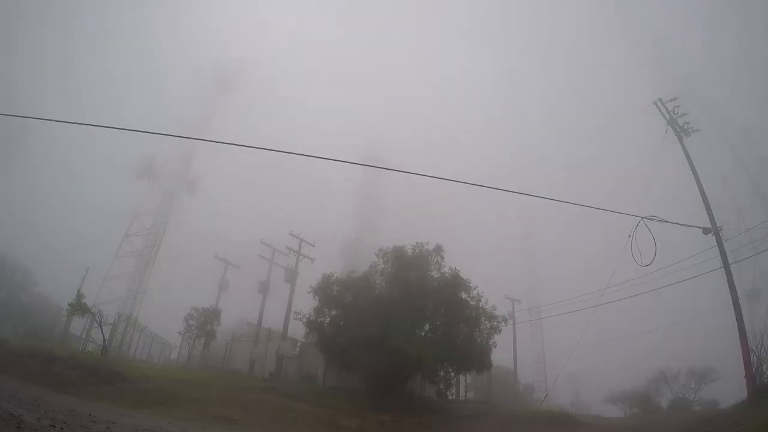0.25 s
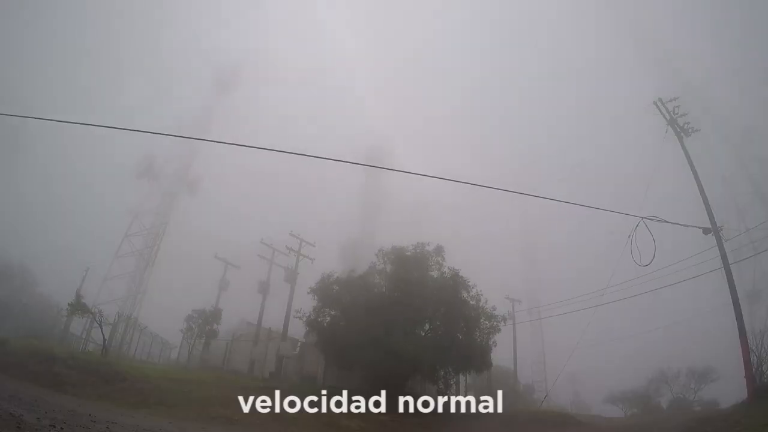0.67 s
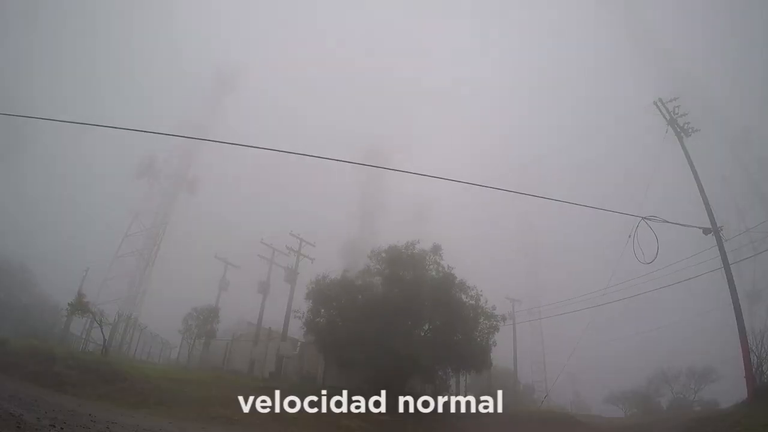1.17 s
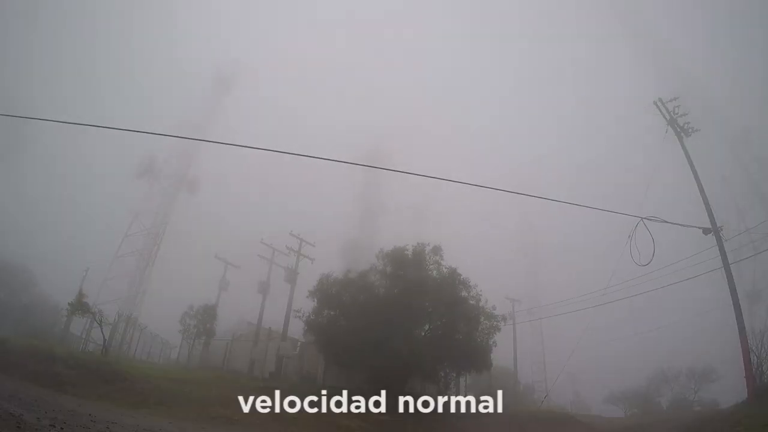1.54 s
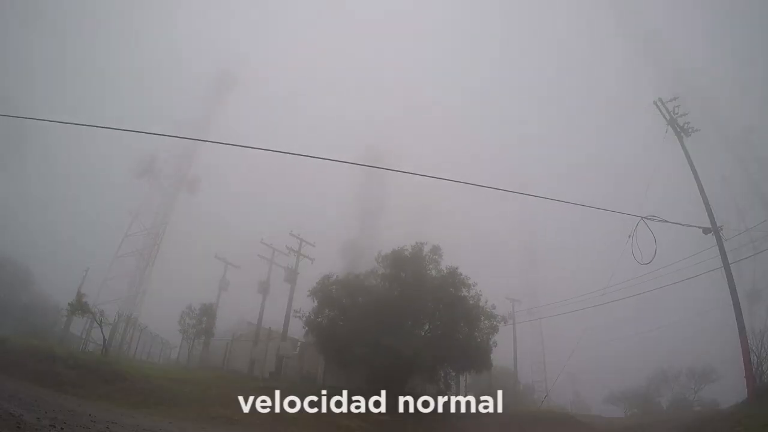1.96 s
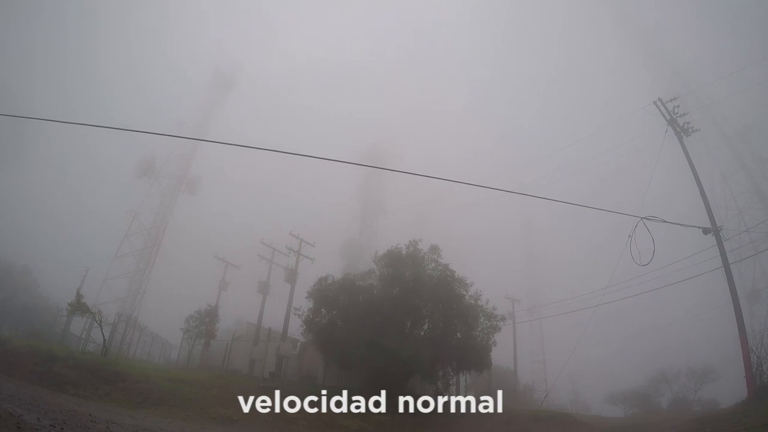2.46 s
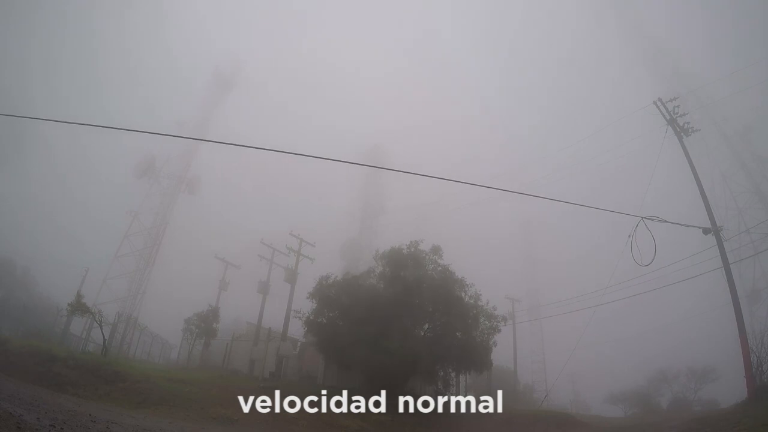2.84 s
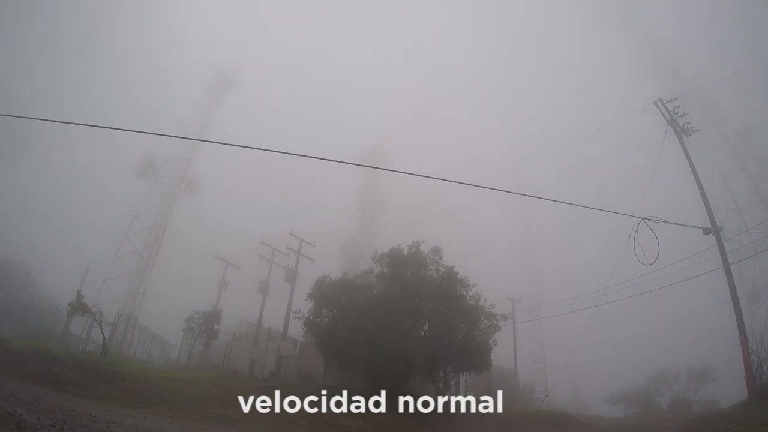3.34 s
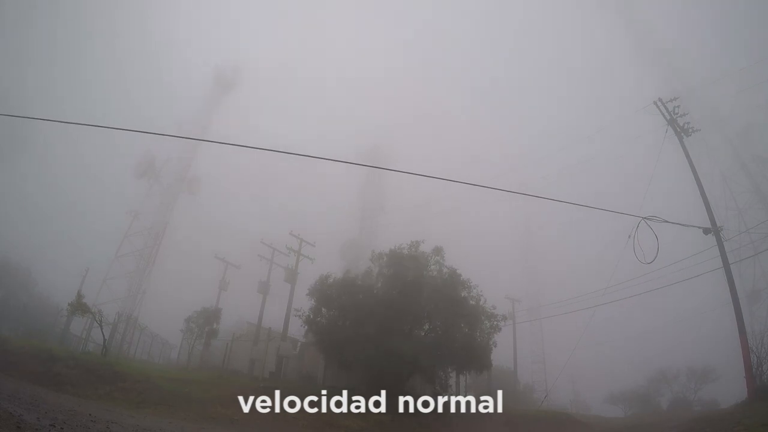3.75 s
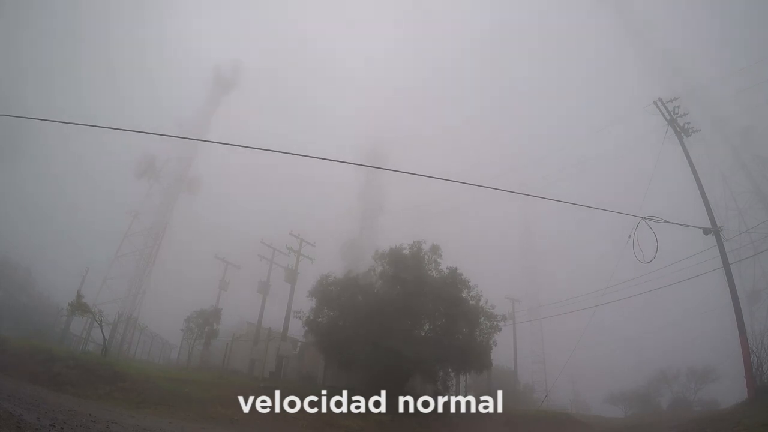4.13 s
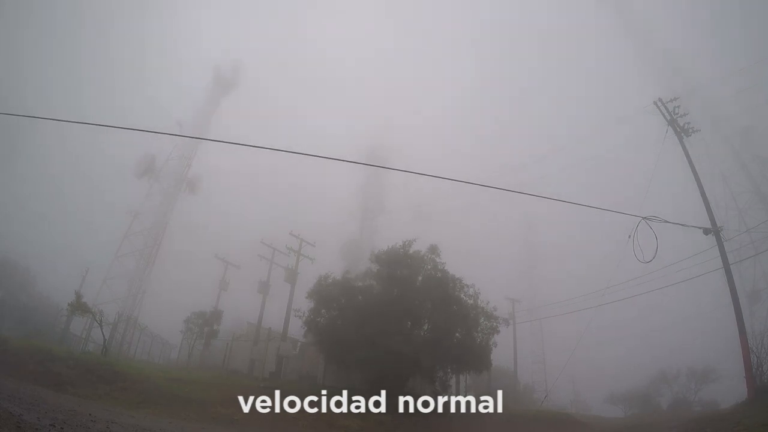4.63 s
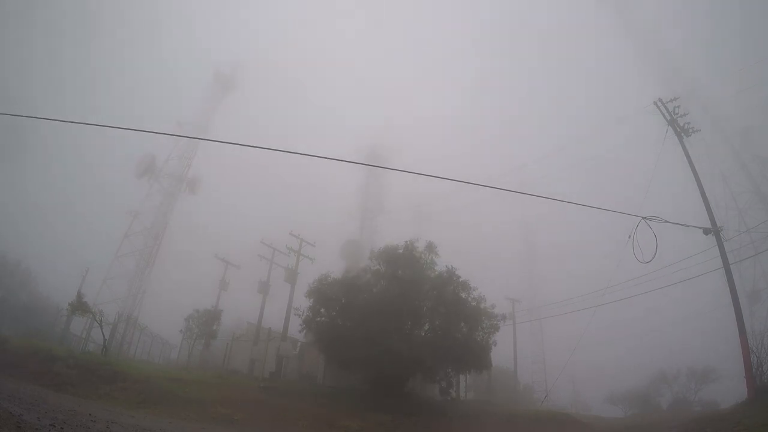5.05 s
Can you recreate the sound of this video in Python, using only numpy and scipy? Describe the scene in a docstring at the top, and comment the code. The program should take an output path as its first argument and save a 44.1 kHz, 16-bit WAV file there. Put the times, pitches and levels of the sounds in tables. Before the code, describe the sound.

At 0 s a small camera in a plastic housing gets one hard knock: a low thud and a rapid rattle of dull, grinding contacts, over almost at once and by far the loudest event. At about 0.07 s a small dry click marks an abrupt cut to outdoor wind. Low, fluttering rumble buffets the microphone closely, with airy rush, faint hollow hoots and a wavering hum from the shaken mount. Sharp raindrop ticks cluster between 0.25 and 0.5 s, then scatter irregularly. Gusts swell near 0.9 and 1.2 s with short, grainy spray hisses; plops land near 1.1, 1.6 and 1.9 s. A strong gust at 2.5-2.6 s brings spray and the heaviest plop, followed by another surge near 2.9 s. Afterward the wind eases unevenly, with ticks near 3.9 and 4.15 s and a few faint plops to 5.3 s. Thin, rapid electronic chirps persist faintly throughout.

```python
"""A small camera in a plastic housing takes one hard, rattling knock: damped swings, struck modes, grinding.
Then comes a dry click at a cut, a step that decays, where the outdoor wind and rain abruptly start.
Gusts of coloured noise buffet the camera, rush over the shell and shake its mount as wavering tones.
Drops of light rain ring modes of case and shell; flurries of spray hiss as grainy noise.
From start to end the electronics chirp faintly, as short, regular sine bursts."""
import sys
import numpy as np
from scipy import signal
from scipy.fft import rfft, irfft
from scipy.io import wavfile

SR = 44100
rng = np.random.default_rng(int(sys.argv[2]) if len(sys.argv) > 2 else 0)


def dump_mix(stems):
    """Bounce the given channels to the path in sys.argv[1] as a 16-bit WAV at rate SR."""
    frames = np.atleast_2d(stems).T  # one column per channel
    limited = np.clip(frames, -1, 1)  # hard clip at full scale
    pcm = np.round(limited * 32767).astype(np.int16)
    wavfile.write(sys.argv[1], SR, pcm)


N = 233402
TIME = np.arange(N) / SR   # s
CUT_S = 0.0689

# Modes of the shell under a drip. Each row: frequency in Hz, relative level in dB, t60 in s.
SHELL_MODES = [(200, -12.5, 0.083), (292, -19.5, 0.11), (523, -11.5, 0.04), (950, -6, 0.0041),
               (1540, 8, 0.0055), (2250, -1.5, 0.0036), (2770, -8, 0.021)]


def from_db(db):
    """Decibels to gain."""
    return 10 ** (np.asarray(db) / 20)


def rms_one(x):
    """Scale to rms 1."""
    return x / np.sqrt(np.mean(x ** 2) + 1e-20)


def in_time(rows):
    """Interpolate each column of a table over time, at every sample."""
    times_s, *columns = np.transpose(rows)
    return [np.interp(TIME, times_s, column) for column in columns]


def drift(rate_hz):
    """Slow random curve of rms 1: white noise low-passed at about rate_hz."""
    bins_hz = np.arange(N // 2 + 1) * SR / N
    spectrum = rfft(rng.standard_normal(N)) / (1 + (bins_hz / rate_hz) ** 2)
    return rms_one(irfft(spectrum, N))


def follow(control_db, share, swing_db, rate_hz):
    """A level that follows a control about its mean, and wanders by chance."""
    return share * (control_db - control_db.mean()) + swing_db * drift(rate_hz)


def noise(colour):
    """Noise of rms 1, its spectrum interpolated in dB over log frequency."""
    hz, db = np.transpose(colour)
    bins_hz = np.arange(1, N // 2 + 2) * SR / N   # one bin up: avoids log(0)
    gain = from_db(np.interp(np.log(bins_hz), np.log(hz), db))
    return rms_one(irfft(rfft(rng.standard_normal(N)) * gain, N))


def resonance(x, hz, width_hz):
    """A two-pole band-pass with gain 1 on top."""
    r = np.exp(-np.pi * width_hz / SR)
    zeros = np.array([1, 0, -1]) * (1 - r * r) / 2
    poles = [1, -2 * r * np.cos(2 * np.pi * hz / SR), r * r]
    return signal.lfilter(zeros, poles, x)


def wavering_tone(hz, wander_hz, rate_hz):
    """A resonance kept going by turbulence: a sine of rms 1 whose pitch never quite holds."""
    pitch_hz = hz + wander_hz * drift(rate_hz)
    return np.sqrt(2) * np.sin(2 * np.pi * np.cumsum(pitch_hz) / SR)


def struck(modes, length_s, detune, spread_db, tilt_db=0):
    """Decaying sines; where the blow lands shifts pitch and strength. Tilt is per octave above mode 1."""
    hz, db, t60_s = np.transpose(modes)[:, :, None]
    t = TIME[:int(length_s * SR)]
    shift, strength = rng.standard_normal((2, len(modes), 1))
    level_db = db + spread_db * strength + tilt_db * np.log2(hz / hz[0]) - 60 * t / t60_s
    sign = (-1) ** np.arange(len(modes))[:, None]   # neighbouring modes move in opposite directions
    ringing = np.sin(2 * np.pi * hz * (1 + detune * shift) * t)
    return np.sum(sign * from_db(level_db) * ringing, axis=0)


def swing(hz, db, decay_s):
    """A heavy part swings and settles: one damped sine."""
    t = TIME[:SR // 8]
    return from_db(db) * np.exp(-t / decay_s) * np.sin(2 * np.pi * hz * t)


def add(track, start_s, sound):
    """Mix a sound into a track at start_s."""
    start = int(np.clip(start_s * SR, 0, N - 1))
    track[start:start + len(sound)] += sound[:N - start]


def plop_filter(plops):
    """Low-pass that keeps the plops dull."""
    return signal.sosfilt(signal.butter(4, 3400, fs=SR, output="sos"), plops)


def electronics(whine_hz=8570, peak_db=-63, burst_s=0.0022, chirps_per_s=29.97):
    """A short, thin chirp once every frame: a sine under Gaussian bursts."""
    phase = (TIME * chirps_per_s - 1 / 3) % 1
    from_middle_s = (phase - .5) / chirps_per_s
    burst = np.exp(-.5 * (from_middle_s / burst_s) ** 2)
    return from_db(peak_db) * burst * np.sin(2 * np.pi * whine_hz * TIME)


def still_air(rms_db=-48):
    """Steady coloured noise under the gusts."""
    # Each row: frequency in Hz, relative level in dB per Hz.
    air_colour = [(20, 18.5), (60, 24.5), (150, -21), (250, -3), (450, 1), (900, -6.5), (1650, 4),
                  (2200, -7.5), (2750, 1.5), (3400, -8), (4500, -8.5), (6500, -14.5), (13000, -22),
                  (16000, -59)]
    return from_db(rms_db) * noise(air_colour)


def hoot(rush_db, mean_db=-57, share=0.99, swing_db=1.5, lag_s=0.024):
    """Turbulence sounds the resonances of the shell's hollow, lagging the rush of air."""
    # Each row: frequency in Hz, width in Hz, relative level in dB.
    hollow_modes = [(507, 57, 0.5), (663.2, 26, 7.5), (814, 50, -4)]
    lagged_rush_db = np.interp(TIME - lag_s, TIME, rush_db)
    level_db = mean_db + follow(lagged_rush_db, share, swing_db, rate_hz=4.4)
    turbulence = rng.standard_normal(N)
    hollow = sum(from_db(db) * resonance(turbulence, hz, width_hz) for hz, width_hz, db in hollow_modes)
    return from_db(level_db) * rms_one(hollow)


def wind(buffet_db, rush_db, lumps_db=1.35, flutter_db=1.7):
    """Eddies thump on the port; faster air rushes over the shell and sounds its hollow."""
    # Each row of both: frequency in Hz, relative level in dB per Hz.
    buffet_colour = [(12, 0.5), (25, -8.5), (45, 2), (60, 6.5), (78, -3.5), (105, -6), (145, -14.5),
                     (170, -16), (240, -22), (400, -33.5), (900, -66)]
    rush_colour = [(150, 7.5), (350, -25.5), (560, -6.5), (850, -7), (1300, -2), (1950, 2), (2350, -2.5),
                   (2850, -4.5), (3350, -19.5), (4800, -23.5), (6500, -40), (15000, -79)]
    buffet = from_db(buffet_db + 2.5 + lumps_db * drift(17)) * noise(buffet_colour)
    rush = from_db(rush_db + 1.5 + flutter_db * drift(52)) * noise(rush_colour)
    return buffet + rush + hoot(rush_db)


def mount(buffet_db, lumps_db=3, hum_mean_db=-44, hum_share=1.12, hum_swing_db=3):
    """The wind keeps two bending modes of the mount swinging, in uneven shoves."""
    # Each row: time in s, sway level in dB before the random lumps.
    sway_curve = [(0.08, -25), (0.36, -31.5), (0.91, -19), (0.95, -38), (1.17, -16.5), (1.21, -40),
                  (1.33, -24), (1.75, -23), (1.82, -35.5), (2.02, -24.5), (2.12, -39.5), (2.2, -16),
                  (2.55, -34.5), (2.6, -16.5), (2.95, -19.5), (3.27, -39), (3.94, -24), (4.61, -27.5),
                  (4.69, -17), (4.98, -35), (5.2, -25), (5.29, -39.5)]
    sway_db, = in_time(sway_curve)
    sway_db = sway_db + lumps_db * drift(11.3)
    sway = from_db(sway_db) * wavering_tone(hz=32, wander_hz=2.07, rate_hz=7.7)
    hum_db = hum_mean_db + follow(buffet_db, hum_share, hum_swing_db, rate_hz=10.4)
    hum = from_db(hum_db) * wavering_tone(hz=122.4, wander_hz=5.0, rate_hz=14.86)
    return sway + hum


def spray(grain_db=3.5):
    """Each flurry arrives at once and thins out, a grainy hiss of countless droplets."""
    # Fine spray thrown by gusts. Each row: start in s, level in dB, length in s.
    flurries = [(0.226, -45, 0.044), (0.854, -36.5, 0.042), (0.936, -44, 0.02), (1.227, -35.5, 0.053),
                (2.529, -36.5, 0.079), (2.78, -40.5, 0.023), (4.288, -45.5, 0.024)]
    # Each row: frequency in Hz, relative level in dB per Hz.
    spray_colour = [(500, -24), (1300, -9), (2200, 3.5), (2900, 1.5), (3500, -12), (5000, -17), (6500, -27),
                    (15000, -60)]
    swell = np.zeros(N)
    for start_s, db, length_s in flurries:
        t = TIME[:int(2 * length_s * SR)]
        onset = 1 - np.exp(-t / 0.00049)
        add(swell, start_s, from_db(db) * onset * np.exp(-(t / length_s) ** 2))
    grain = from_db(grain_db * drift(150))
    return swell * rms_one(grain * noise(spray_colour))


def patter(rush_db, count=170):
    """Soft drops blown against the shell, more and louder in the rush, give the gusts their grain."""
    out = np.zeros(N)
    chance = from_db(.8 * rush_db)
    samples = rng.choice(N, count, p=chance / chance.sum())
    sizes = rng.uniform(-1.1, 1, count)
    for at, size in zip(samples, sizes):
        plop = struck(SHELL_MODES[3:], length_s=.02, detune=.12, spread_db=3, tilt_db=3)
        peak_db = rush_db[at] + 5.5 + 3.0 * size
        add(out, at / SR, from_db(peak_db) * plop / np.abs(plop).max())
    return plop_filter(out)


def tick(tilt_db, splash_s=0.00092):
    """A drop rings the case, and its splash keeps exciting it for about a millisecond; peak 1."""
    # Modes of the case. Each row: frequency in Hz, relative level in dB, t60 in s.
    case_modes = [(2450, -5, 0.0025), (3460, -1.5, 0.0015), (5120, -4, 0.0023), (7220, -6, 0.0028),
                  (7400, -3, 0.001), (9730, -10.5, 0.0027), (12640, -7, 0.0013), (15200, -15, 0.0019)]
    t = TIME[:SR // 200]
    force = .33 * rng.standard_normal(len(t)) * np.exp(-t / splash_s)
    force[0] = 1   # the impact itself
    ringing = struck(case_modes, length_s=.012, detune=0.047, spread_db=2.6, tilt_db=tilt_db)
    sound = np.convolve(force, ringing)
    return sound / np.abs(sound).max()


def drizzle(rush_db, count=150, smallest_db=-46, size_db=2.5, tilt_db=-4, tilt_spread_db=9.5):
    """Tiny droplets land at random, more of them in the gusts; most are faint, a few stand out."""
    out = np.zeros(N)
    chance = from_db(0.41 * rush_db)
    times_s = rng.choice(TIME, count, p=chance / chance.sum())
    sizes = np.minimum(rng.exponential(1, count), 3)
    colours = rng.uniform(-1.3, 1, count)
    for start_s, size, colour in zip(times_s, sizes, colours):
        peak_db = smallest_db + size_db * size
        add(out, start_s, from_db(peak_db) * tick(tilt_db + tilt_spread_db * colour))
    return out


def rain():
    """Small drops tick sharply on the case; heavy drips plop on the shell through a low-pass."""
    # Each row of both: time in s, peak in dB (drips: before the low-pass), brightness in dB per octave.
    drops = [(0.25, -26, -11), (0.254, -25.5, 1), (0.282, -22, -7), (0.319, -20.5, -3), (0.33, -23.5, 14),
             (0.404, -30, -9), (0.419, -33, -2), (0.454, -20.5, -8), (0.465, -31, -3), (0.471, -29, -3.5),
             (1.143, -32.5, -3), (1.365, -35, 2), (1.691, -27, -2), (1.804, -23, -2.5), (1.907, -32, -8.5),
             (1.928, -33, -1.5), (2.058, -32, -5), (2.402, -28.5, -7), (2.5, -32.5, -1),
             (2.727, -26.5, -1.5), (2.761, -29, 0), (2.878, -29, 4), (2.951, -28, -7), (3.141, -28, -4.5),
             (3.401, -34, -4), (3.461, -27.5, -2.5), (3.569, -32, -1.5), (3.913, -25, -4),
             (3.951, -26, -4.5), (4.077, -37.5, -2), (4.102, -35.5, -2), (4.153, -22, -2.5),
             (4.182, -30, -4)]
    drips = [(1.1379, -21.5, -3), (1.6371, -22, -2.5), (1.946, -25, 1), (2.04, -41, -5), (2.214, -30.5, 19),
             (2.551, -27, 0), (2.608, -26, 3), (2.6296, -13, -0.5), (4.292, -39, 9), (4.393, -37, 2),
             (4.593, -33.5, 4), (4.813, -31.5, 0.5), (5.147, -36.5, -1)]
    ticks, plops = np.zeros(N), np.zeros(N)
    for time_s, db, tilt_db in drops:
        add(ticks, time_s - .0003, from_db(db) * tick(tilt_db))   # starts just ahead of the listed time
    for time_s, db, tilt_db in drips:
        plop = struck(SHELL_MODES, length_s=.05, detune=.03, spread_db=1.5, tilt_db=tilt_db)
        add(plops, time_s, from_db(db) * plop / np.abs(plop).max())
    return ticks + plop_filter(plops)


def click(peak_db=-28, decay_s=.002):
    """One dry click at the cut: a step that decays within milliseconds."""
    out = np.zeros(N)
    add(out, CUT_S, from_db(peak_db) * np.exp(-TIME[:SR // 20] / decay_s))
    return out


def knock(dull_hz=2300, rub_db=-28, rub_s=0.058, grind_db=-10):
    """The camera lurches, then rattles: the longer a contact lasts, the duller its blow."""
    # A quick run of contacts. Each row: start in s, relative level in dB, approximate contact time in s.
    contacts = [(0.016, -5, 0.00034), (0.0196, -2, 0.00036), (0.0221, -12, 0.00055),
                (0.0251, -3.5, 0.00045), (0.0281, -12, 0.00031), (0.0294, -27.5, 0.00055),
                (0.036, -2.5, 0.00074)]
    # Modes of camera and mount. Each row: frequency in Hz, relative level in dB, t60 in s.
    body_modes = [(150, -7.5, 0.058), (225, -10.5, 0.08), (314, -5, 0.05), (502, -4, 0.022),
                  (683, -7, 0.021), (900, -7.5, 0.02), (1295, -3.5, 0.01), (1580, -19, 0.0029),
                  (2220, -31, 0.0059)]
    # Each row: frequency in Hz, relative level in dB per Hz.
    grind_colour = [(100, -7), (600, 3), (1500, -8), (2500, -17.5), (5000, -23), (12000, -18)]
    out, grip = np.zeros(N), np.zeros(N)
    t = TIME[:SR // 10]
    add(out, 0, -swing(hz=80, db=2.0, decay_s=0.0072))
    add(out, contacts[0][0], swing(hz=47.1, db=-5.5, decay_s=0.038))
    # the surfaces rub lightly throughout the lurch
    add(grip, 0, from_db(rub_db) * np.exp(-t / rub_s))
    for start_s, db, contact_s in contacts:
        push = np.hanning(int(contact_s * SR) + 3)
        ringing = struck(body_modes, length_s=.1, detune=.012, spread_db=1)
        add(out, start_s, from_db(db + 0.5) * np.convolve(push / push.sum(), ringing))
        # and they grind for a few milliseconds at each contact
        add(grip, start_s, from_db(db) * np.exp(-t / .0025))
    grind = from_db(grind_db) * grip * noise(grind_colour)
    return signal.sosfilt(signal.butter(2, dull_hz, fs=SR, output="sos"), out + grind)


def scene():
    """The knock comes first; the wind and rain start abruptly at the cut."""
    # The wind. Each row: time in s, buffeting in dB, rush of air in dB, both before wind()'s offsets.
    gusts = [(0.07, -34, -42), (0.16, -36.5, -51), (0.26, -31.5, -41), (0.35, -38, -47), (0.48, -33, -41),
             (0.79, -35.5, -53), (0.87, -31, -42), (1.08, -32.5, -44), (1.23, -27.5, -38),
             (1.31, -30, -44.5), (1.56, -40, -56), (1.86, -35.5, -48.5), (1.98, -30, -42.5),
             (2.2, -36, -50), (2.3, -47, -59), (2.5, -40.5, -58), (2.57, -25.5, -37.5), (2.7, -35, -48.5),
             (2.88, -29, -40.5), (3.08, -41, -55.5), (3.44, -40.5, -53), (3.8, -45.5, -62),
             (4.27, -35.5, -51.5), (4.6, -40.5, -53), (4.76, -39, -59), (5.29, -45, -62)]
    buffet_db, rush_db = in_time(gusts)
    air = still_air() + wind(buffet_db, rush_db) + mount(buffet_db)
    water = spray() + patter(rush_db) + drizzle(rush_db) + rain()
    weather = (air + water) * (TIME > CUT_S)
    return (electronics() + weather + click() + knock())[None]


def record(dry, ceiling=1.0, cutoff_hz=15700):
    """The loudest peaks are rounded off and the top of the treble is cut."""
    rounded = dry / (1 + (dry / ceiling) ** 4) ** (1 / 4)
    return signal.sosfilt(signal.ellip(10, .1, 90, cutoff_hz, fs=SR, output="sos"), rounded)


dry = scene()
out = record(dry)
dump_mix(out)
```